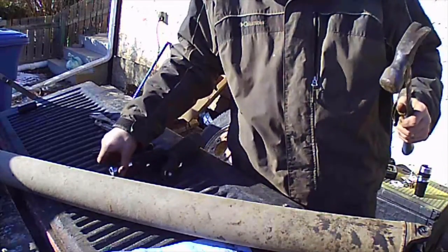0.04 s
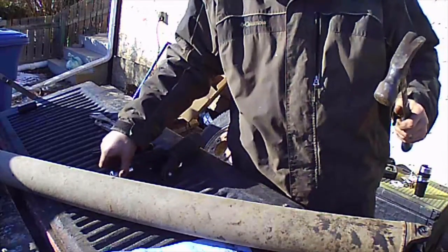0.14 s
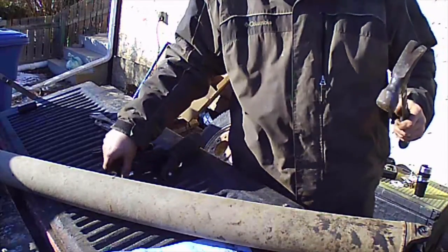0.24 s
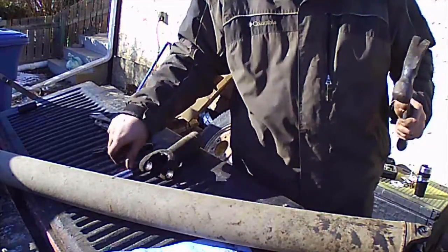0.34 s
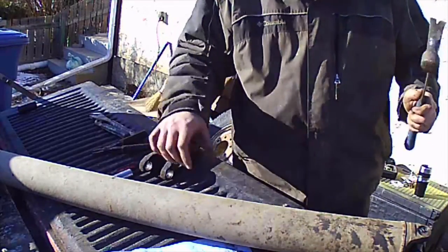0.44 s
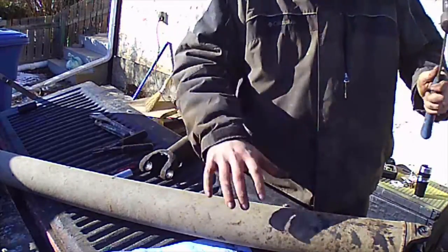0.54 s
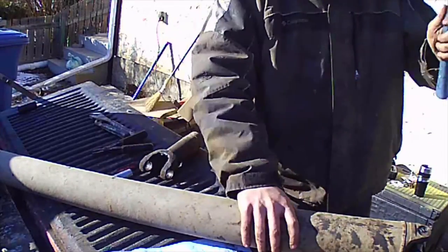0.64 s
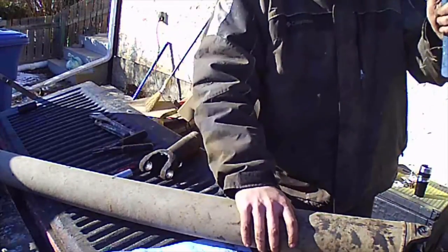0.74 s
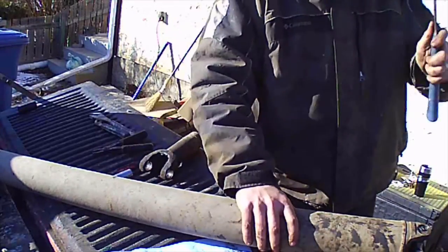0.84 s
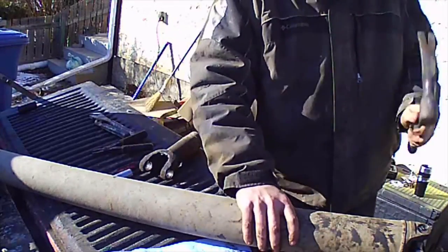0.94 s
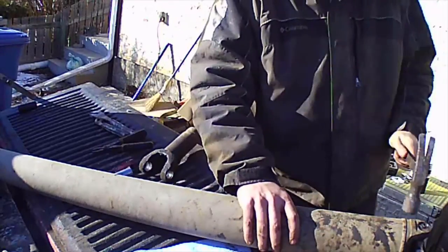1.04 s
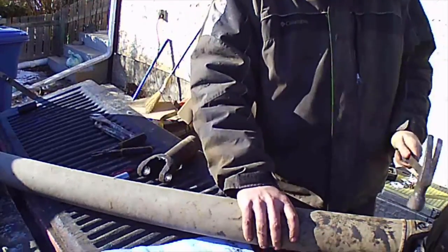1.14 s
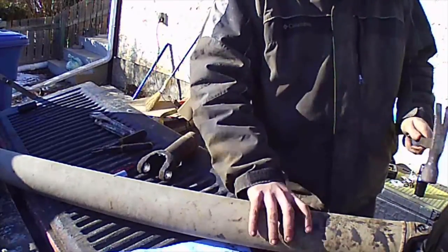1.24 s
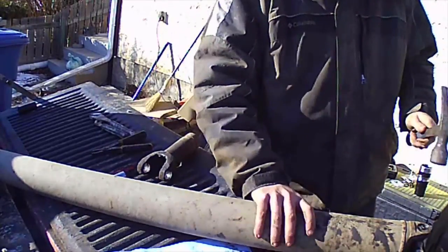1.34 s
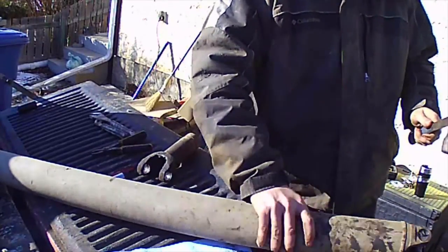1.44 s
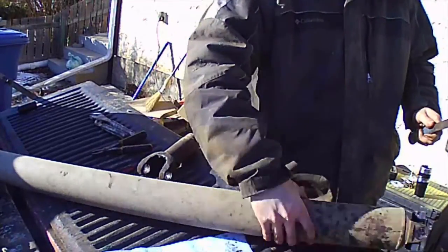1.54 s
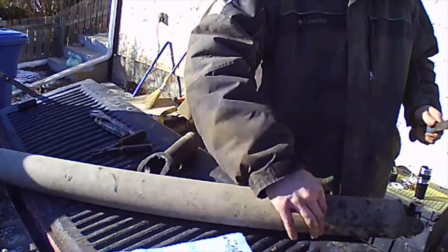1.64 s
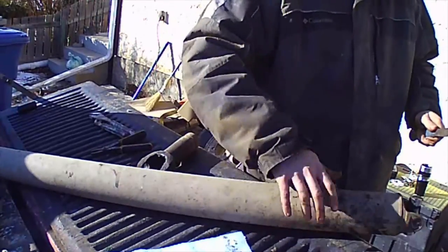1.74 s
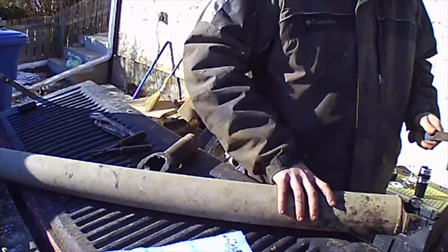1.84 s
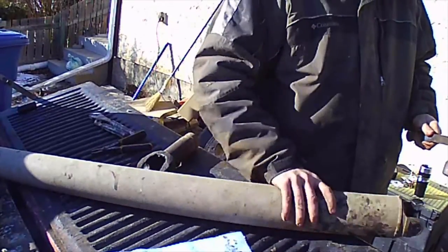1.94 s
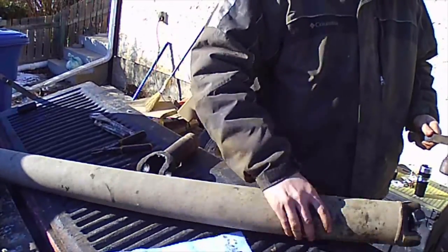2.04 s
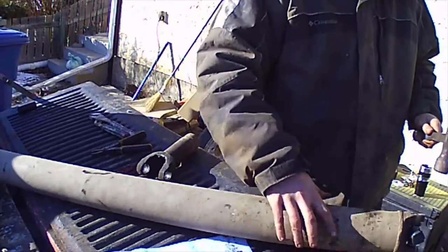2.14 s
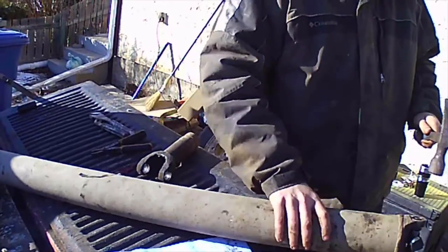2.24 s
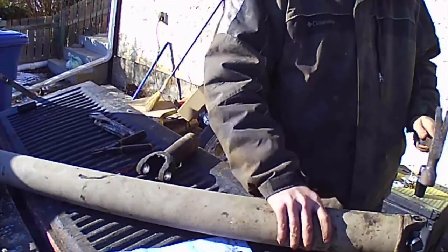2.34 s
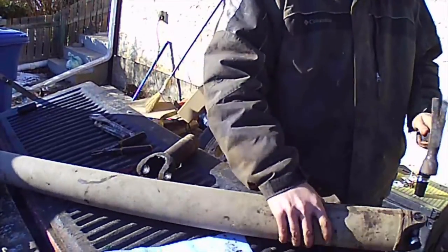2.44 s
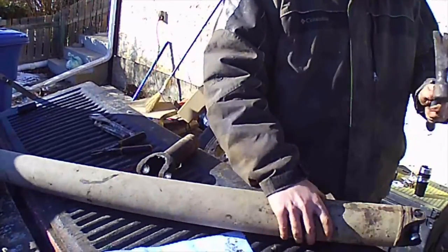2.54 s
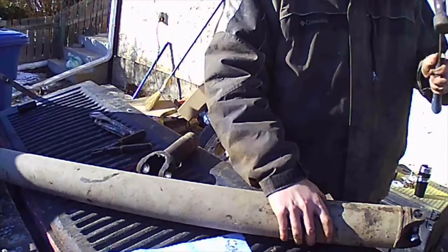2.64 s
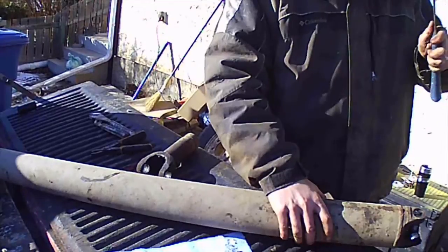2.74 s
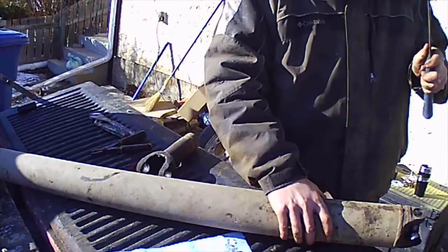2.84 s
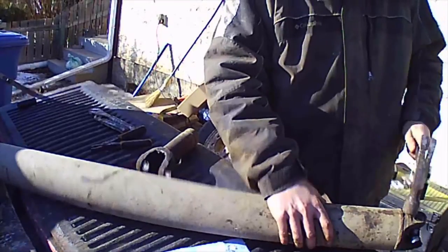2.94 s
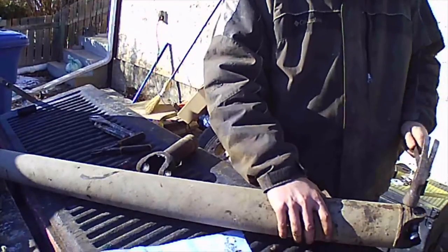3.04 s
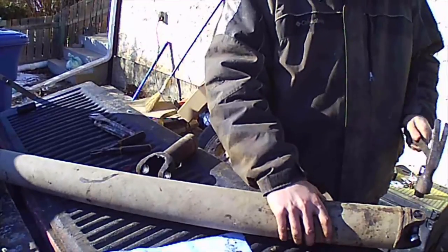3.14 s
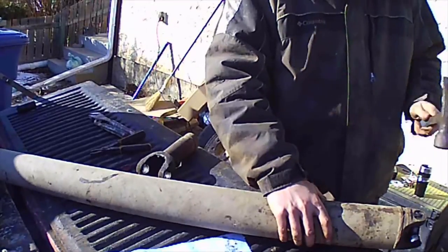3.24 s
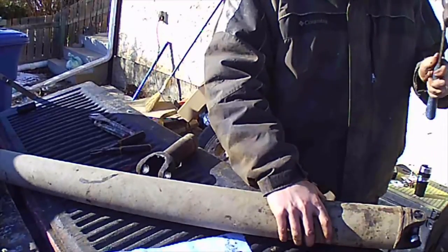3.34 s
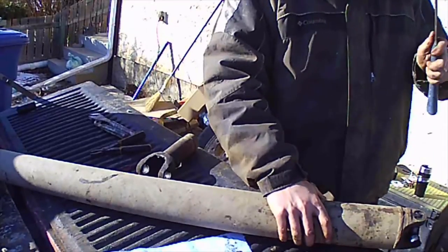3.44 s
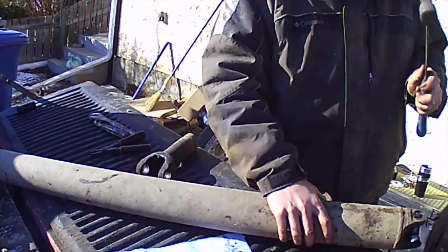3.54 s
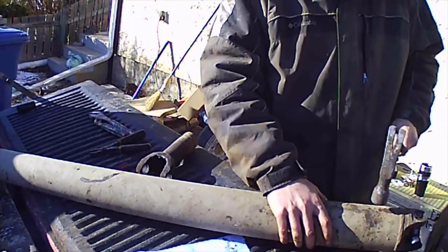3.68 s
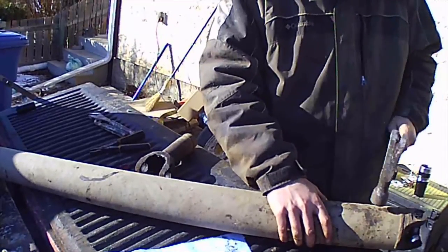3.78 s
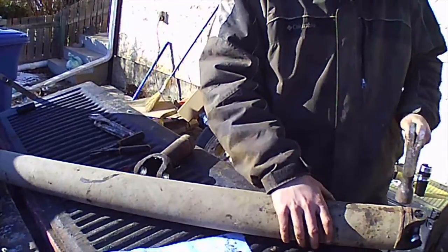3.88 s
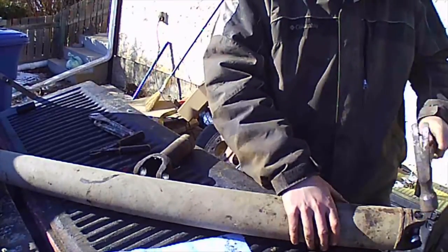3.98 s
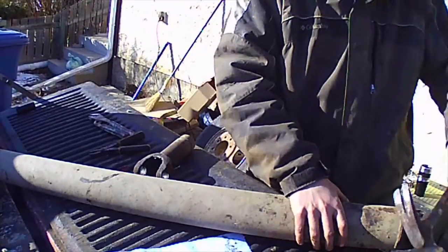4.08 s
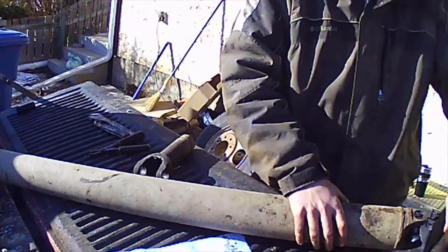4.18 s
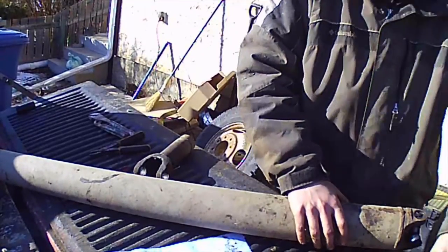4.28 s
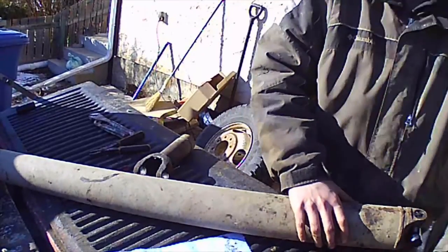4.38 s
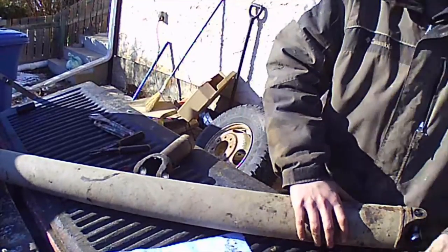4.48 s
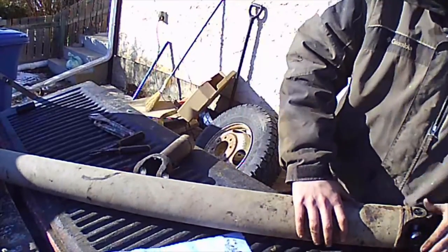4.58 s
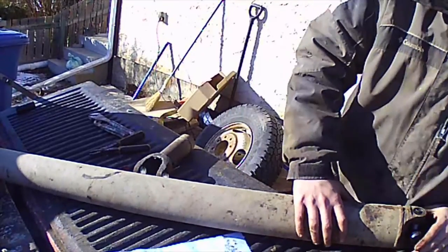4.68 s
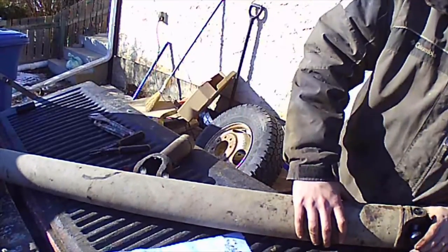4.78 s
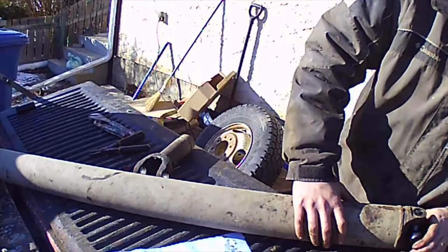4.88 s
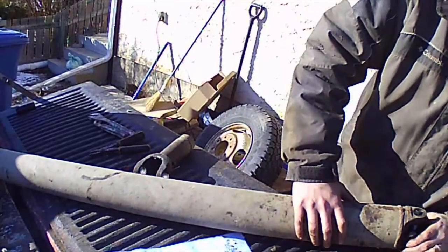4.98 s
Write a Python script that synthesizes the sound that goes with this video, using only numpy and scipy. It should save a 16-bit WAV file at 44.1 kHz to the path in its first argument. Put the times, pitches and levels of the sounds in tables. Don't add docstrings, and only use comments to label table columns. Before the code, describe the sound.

A close, mono microphone outdoors, dry, with faint steady hiss. Small tools tap the ribbed tailgate liner at about 0.1 and 0.25 s, with a faint tick at 0.7. At 1.0 s a hammer hits the driveshaft joint: a harsh, clipped metallic crack, short steel ring and clatter, several rapid rebounds until 1.2, and a deep wobbling boom near 45 Hz from the sprung gate. Tiny ticks come around 1.5, then from 1.57 to 1.75 the heavy tube rolls over the ribs with hollow knocks, loud scraping, grinding and bright chinks. Softer dull bumps and drags follow at 2.1 and 2.45. The second blow lands at 2.97, its tube ring more damped; the third at 3.63 rings most, with bounces at 3.75 and 3.87. From 4.3 to 4.6 a tight run of hard knocks and rattles marks the hammer laid down, thinning to soft bumps and hiss by 4.8.

```python
import sys
import numpy as np
from scipy import signal
from scipy.fft import rfft, irfft
from scipy.io import wavfile
from scipy.ndimage import uniform_filter1d

SR = 44100
rng = np.random.default_rng(int(sys.argv[2]) if len(sys.argv) > 2 else 0)


def decibels_to_gain(level_db):
    exponent = np.asarray(level_db, float) / 20
    return 10 ** exponent


def unload_audio(sound):
    columns = np.transpose(np.atleast_2d(sound))
    steps = np.round(np.clip(columns, -1, 1) * 32767)
    wavfile.write(sys.argv[1], SR, steps.astype(np.int16))


N = 221029
TIME = np.arange(N) / SR
LONG, SHORT = int(.8 * SR), int(.2 * SR)
BANDS_HZ = 140 * 2 ** np.arange(0, 6.8, 1 / 3)

# [t/s, clatter/dB, tube ring/dB, clatter stretch/1, ring stretch/1, truck bed/dB]
BLOWS = [
    (1.0106, -2.5, 2.5, 0.68, 0.75, -20),
    (2.9738, -2.5, -8.5, 0.78, 0.92, -22.5),
    (3.6331, -2, 5, 0.75, 0.55, -18),
]
# [f/Hz, level/dB per Hz]
CLATTER = [(82, -34), (140, -10.5), (520, -5), (781, -9.5), (1500, -3), (2560, -2.5), (3720, -7), (4630, 1),
           (5750, -9.5), (7010, -7), (7580, -11), (14300, -8), (15800, -26)]
# [f/Hz, t60/s]
CLATTER_T60 = [(150, 0.8), (500, 0.52), (1500, 0.4), (4000, 0.21), (9000, 0.19), (15000, 0.13)]
TUBE_HZ = [309, 369, 771, 1302, 1631, 1701, 1766, 2040, 2190, 2285, 2369, 2487, 2633, 2818]
# [blow 1/dB, blow 2/dB, blow 3/dB, bumps/dB, t60/s]
TUBE = [(-37.5, -26, -29, -9, 1.3), (-38.5, -32, -33.5, -18.5, 1.7), (-32.5, -24, -38.5, -5.5, 0.91),
        (-33, -55, -56, -29.5, 1.8), (-12, -17.5, -19.5, -18.5, 0.23), (-4, -1.5, -12, -14, 0.16),
        (-6, -14, -11, -13, 0.36), (-24, -22, -9, -17.5, 0.3), (-36.5, -40.5, -36.5, -15, 0.25),
        (-9, -23, -16.5, -11, 0.51), (-19, -29, -29, -7.5, 0.75), (-18, -9.5, -5.5, -7, 0.4),
        (-11, -9, -12, -9.5, 0.18), (-20.5, -15, -22.5, -18, 0.067)]
YOKE_HZ = [2955, 3038, 3287, 3467, 3953, 4200, 4540, 5100, 5640, 6840, 7208, 7545, 8420, 11750]
# [blow 1/dB, blow 2/dB, blow 3/dB, bumps/dB, t60/s]
YOKE = [(-13, -12, -12, -22.5, 0.096), (-20.5, -14.5, -8.5, -17.5, 0.083), (-7, 1, -7, -20.5, 0.17),
        (-23, -27, -23, -20, 0.34), (-11.5, -15, -12.5, -8, 0.25), (-17.5, -19, -12.5, -23, 0.39),
        (-7.5, -19, -15, -11, 0.2), (-15, -24, -23.5, -18.5, 0.15), (-24, -31.5, -26, -25.5, 0.13),
        (-21.5, -22, -18, -16, 0.43), (-16, -18.5, -12.5, -32, 0.064), (-22.5, -16.5, -21, -34.5, .13),
        (-17.5, -20.5, -15, -27.5, 0.24), (-23, -17, -26, -36, 0.25)]
BODY_HZ = [
    [1100, 1766, 2283, 2622, 2816, 2955, 3284, 3467, 3958, 4205, 4533, 4786, 5087, 6780],
    [1077, 1690, 2396, 2629, 2817, 2955, 3321, 527, 4301, 4545, 4904, 5112, 6239, 6842],
    [1765, 2041, 2485, 2636, 3036, 3289, 3479, 4198, 4553, 4808, 5270, 530, 6790, 7214],
]
# [width/Hz, level/dB]
BODY = [
    [(130, -5.5), (59, 0), (20, -.5), (27, -6), (21, -10), (17, -4), (27, -6), (40, -7), (22, -7.5),
     (35, -7), (30, .5), (25, -7), (40, -11.5), (37, -13)],
    [(59, -5.5), (60, -1), (50, -4), (20, 2), (25, -4), (25, -3), (33, -5), (30, 0), (29, -6), (40, -6),
     (21, -7), (30, -14), (27, -9), (52, -7.5)],
    [(74, -6), (17, 3), (25, 1.5), (26, -4), (38, -6), (22.01, -4), (30, -7.5), (25, -.5), (40, -7),
     (40, -9), (30, -11), (28, -2), (45, -6.5), (20, -8)],
]


def hammer():
    power, rings = np.zeros((len(BANDS_HZ), N)), np.zeros(N)
    *weights_db, _, t60_s = np.transpose(TUBE + YOKE)
    for (s, clatter_db, ring_db, stretch, free, bed_db), mode_db in zip(BLOWS, weights_db):
        bed_tail = fade(np.full(len(BANDS_HZ), .55), size=LONG)
        bed = decibels_to_gain(bed_db) * bed_tail * (BANDS_HZ[:, None] / 1000) ** -.6
        tail = fade(stretch * on_log(CLATTER_T60, BANDS_HZ), size=LONG) + bed
        add(power, s, (decibels_to_gain(clatter_db) * colour(CLATTER) * tail) ** 2)
        add(rings, s, ring(TUBE_HZ + YOKE_HZ, mode_db + ring_db, free * t60_s, size=LONG, rough_db=3))
    dry_clatter = np.sum(np.sqrt(power) * grit(spread_db=2, patchy_db=2.5), axis=0)
    clatter = sheet(dry_clatter, db=2, count=40)
    body = np.zeros(N)
    for blow, hz, peaks in zip(BLOWS, BODY_HZ, BODY):
        body += excite(clatter, blow[0], np.column_stack([hz, peaks]), db=8, fade_s=.046)
    return rings + decibels_to_gain(-2.5) * (clatter + body)


# [f/Hz, level/dB per Hz]
LINER = [(59, -34), (100, -7.5), (500, -4), (631, -4.5), (923, -8), (1070, -5), (2060, -12), (2440, -16),
         (11500, -35.5), (15800, -47)]
# [f/Hz, share of bump t60/1]
LINER_T60 = [(150, 0.97), (600, 1.26), (2000, 0.7), (6000, 1.6), (15000, 0.29)]
# [t/s, peak/dB, treble/dB, t60/s]
TOOLS = [
    (0.081, -37.5, -39, 0.23),
    (0.228, -25, -14.5, 0.36),
    (0.285, -28, -16.5, 0.17),
    (0.71, -45, 1, 0.15),
]
# [t/s, peak/dB, treble/dB, t60/s]
REBOUNDS = [(1.084, -10.5, -3.5, 0.16), (1.121, -9, -9.5, 0.19), (1.157, -16.5, -8, 0.33),
            (1.199, -14, -12.5, 0.15), (3.048, -12, -2, 0.22), (3.079, -10, -8.5, 0.17),
            (3.16, -24, -8, 0.15), (3.186, -27.5, -26.5, 0.15), (3.709, -28, -19, 0.082),
            (3.745, -11.5, -10, 0.39), (3.873, -20, -10.5, 0.23)]
# [t/s, peak/dB, treble/dB, t60/s]
ROLL = [(1.476, -36.5, -4, 0.1), (1.494, -37, -1, 0.11), (1.519, -37, -7, 0.14), (1.569, -11.5, -32, 0.14),
        (1.572, -12.5, -29, 0.096), (1.588, -21, -4, 0.08), (1.619, -17, -20.5, 0.2),
        (1.652, -19, -17, 0.14), (1.668, -14.5, -12.5, 0.27), (1.706, -20, -13, 0.17),
        (1.731, -23.5, -6.5, 0.19), (1.855, -49, -1.5, 0.169), (1.998, -49.5, -5.5, 0.12),
        (2.079, -28, -36, 0.34), (2.133, -34.5, -33, 0.16), (2.27, -45.5, 0.5, 0.054),
        (2.321, -55.5, -7.5, 0.12), (2.436, -27.5, -33, 0.15), (2.49, -38.5, -21, 0.069),
        (2.525, -41.5, -2, 0.16)]
# [t/s, peak/dB, treble/dB, t60/s]
KNOCKS = [(4.306, -22, -6, 0.143), (4.3438, -17, -14, 0.24), (4.3505, -25, 1.5, 0.11),
          (4.4125, -22, -11.5, 0.14), (4.4378, -17, -7.5, 0.18), (4.451, -22.5, -3.5, 0.12),
          (4.464, -16.5, -6, 0.21), (4.498, -23.5, -12, 0.178), (4.568, -21, -11, 0.14),
          (4.635, -30, -12, 0.16), (4.694, -32.5, -13, 0.2), (4.725, -35.5, -40, 0.22),
          (4.799, -50, -13.5, 0.16)]
BUMP_RING_DB = [None, -24, -23, None]
TREBLE_SHARE = [.9, .6, .8, .55]
# [t/s, level/dB, rise/s, fall/s, treble/dB]
DRAGS = [(.714, -56, 0.013, 0.013, 9), (1.3, -45.5, .06, 0.28, -5), (1.455, -45, .012, 0.1, 3),
         (1.557, -33.5, 0.17, 0.077, 1), (1.575, -16.5, 0.013, .13, -2.5), (1.623, -17, 0.013, 0.167, -0.5),
         (1.82, -50, .08, 0.12, 4), (2.005, -43.5, 0.018, 0.236, 4), (2.075, -38.5, 0.13, 0.28, -0.5),
         (2.22, -42.5, 0.016, 0.08, 0.5), (2.41, -55, 0.12, 0.055, 6), (2.44, -33, 0.078, 0.14, 2),
         (3.28, -46, 0.089, 0.32, -4.5), (4.02, -49, .08, 0.29, 1), (4.306, -40, 0.0028, 0.11, 1),
         (4.352, -36, .004, .09, 5), (4.441, -21, 0.002, 0.03, 2.5), (4.53, -35, 0.15, 0.22, -9),
         (4.72, -57.5, .06, .12, -11)]
ROLLING_HZ = [614, 1077, 1717, 2293, 2476, 2632, 2830, 3040, 3295, 3461, 4221, 4550, 4791, 5050]
# [width/Hz, level/dB]
ROLLING = [(30, -4.5), (29.8, -1.5), (30, -4), (14, 4), (25, -3), (19, -1), (26, -1), (30, -5), (17, -7),
           (26, -1), (40, 3), (38, -5), (30, 0), (40, -3)]


def handling():
    power, rings, rub = np.zeros((len(BANDS_HZ), N)), np.zeros(N), np.zeros(N)
    *_, mode_db, tube_t60_s = np.transpose(TUBE + YOKE)
    for bumps, ring_db, share in zip([TOOLS, REBOUNDS, ROLL, KNOCKS], BUMP_RING_DB, TREBLE_SHARE):
        band_share = on_log(LINER_T60, BANDS_HZ) * np.where(BANDS_HZ > 2800, share, 1)
        for s, db, treble_db, t60_s in bumps:
            tail = fade(t60_s * band_share, size=SHORT) + fade(np.array([.01]), size=SHORT)
            tail = swell(BANDS_HZ, size=SHORT) * tail
            add(power, s, (decibels_to_gain(db - 10.5) * colour(LINER, treble_db + 8.0) * tail) ** 2)
            if ring_db is None:
                continue
            spot_db = 1.7 * rng.standard_normal(len(tube_t60_s))
            bump_db = mode_db + spot_db + db + ring_db
            add(rings, s, ring(TUBE_HZ + YOKE_HZ, bump_db, .5 * tube_t60_s, size=SHORT, rough_db=4))

    steel_db, knee_db, slope = -18, -25, .86
    for s, db, rise_s, fall_s, treble_db in DRAGS:
        rise_s, fall_s = max(rise_s, .002), max(fall_s, .01)
        i = slice(int((s - 1.7 * rise_s) * SR), int((s + 2 * fall_s) * SR))
        gain = decibels_to_gain(db - 8.5 - 20 * np.maximum((s - TIME[i]) / rise_s, (TIME[i] - s) / fall_s))
        power[:, i] += (gain * colour(LINER, treble_db + 0.5)) ** 2
        rub_db = steel_db + min(treble_db, 0) - slope * max(db - knee_db, 0)
        rub[i] += (gain * decibels_to_gain(rub_db)) ** 2

    rattle = np.sum(np.sqrt(power) * grit(spread_db=3, patchy_db=2.5), axis=0)
    rolling = excite(rattle, 1.56, np.column_stack([ROLLING_HZ, ROLLING]), db=5, fade_s=.8)
    return rings + np.sqrt(rub) * grinding() + rattle + rolling


GRIND_HZ = [2400, 3050, 3500, 4300, 4900, 5600, 6900, 8600, 9900, 11600, 13900, 14600]


def grinding():
    modes = np.array([band(rng.standard_normal(N), hz, 0.037 * hz) for hz in GRIND_HZ])
    modes = modes / np.std(modes, axis=1, keepdims=True)
    flare_db = 5 * flutter(30, modes.shape)
    return unit(np.sum(modes * decibels_to_gain(flare_db), axis=0))


# [t/s, peak/dB, t60/s, modes above 800 Hz/dB]
LANDINGS = [(.285, -40, .1, -7), (1.569, -18.5, .12, -3), (1.62, -23, 0.1, -5), (1.652, -27.5, 0.11, 2.5),
            (1.707, -31, 0.13, -1.5), (2.08, -33, .12, -6.5), (2.12, -37, 0.17, -15),
            (2.44, -36, 0.13, -7.5), (2.5, -37, 0.1, -15.5), (2.976, -14.5, 0.18, -20.5),
            (3.636, -15.5, .2, -21.5), (4.635, -43, .1, -2), (4.694, -47, 0.095, -11),
            (4.725, -46.5, 0.13, -10)]
# [f/Hz, level/dB]
HOLLOW = [(230, -3.5), (385, 2), (640, -4.5), (1050, -2), (1430, -3.5), (1770, -8.5), (2480, -9)]
# [t/s, peak/dB, t60/s]
CHINKS = [
    (1.731, -34.5, 0.1),
    (1.745, -50, .2),
    (1.769, -41.5, 0.12),
    (1.788, -57, 0.16),
    (1.862, -50.5, 0.11),
    (1.901, -58.5, .1),
]
# [f/Hz, level/dB]
CROSS = [(2030, -6), (2480, -3), (2630, -7.5), (2830, -3.5), (3030, -7), (3290, -15), (3570, -13),
         (4230, 1), (4550, -5), (4790, -9), (5100, -11)]


def landings():
    out = np.zeros(N)
    hz, weight_db = np.transpose(HOLLOW)
    for s, db, t60_s, top_db in LANDINGS:
        mode_db = db + weight_db + top_db * (hz > 800)
        add(out, s, ring(hz, mode_db, np.full(len(hz), t60_s), size=SHORT, rough_db=3))
    hz, weight_db = np.transpose(CROSS)
    for s, db, t60_s in CHINKS:
        add(out, s, ring(hz, db + weight_db, np.full(len(hz), t60_s), size=SHORT, rough_db=2.5))
    return out


# [t/s, peak/dB, f/Hz]
CRACKS = [(0.084, -42, 1300), (0.228, -26, 1310), (0.284, -35, 1300), (1.569, -13, 1300),
          (2.077, -32, 1296), (2.271, -46, 1300), (2.318, -53, 1300), (2.436, -34, 1300),
          (3.874, -23.5, 1310), (4.306, -23, 1310), (4.343, -17, 1300), (4.412, -22, 1300),
          (4.437, -16, 1300), (4.45, -18, 1300), (4.463, -24, 1300), (4.497, -23, 1300), (4.569, -27, 1300),
          (4.573, -25, 1300), (4.635, -35, 1300), (4.693, -43, 1300)]
# [t/s, f/Hz, peak/dB, t60/s]
GLINTS = [(1.575, 7060, -44, .1), (1.59, 5760, -42, .12), (1.638, 11600, -50, .1), (1.64, 14100, -54, .1),
          (1.648, 10000, -54, .1), (1.652, 11250, -52, .08), (1.655, 11700, -47, .08),
          (1.655, 14600, -55, .08), (1.66, 10000, -52, .06), (1.732, 9800, -55, .12),
          (1.732, 7300, -48, .1), (4.3505, 4850, -29.5, .025), (4.3505, 10800, -42, .05),
          (4.464, 4500, -41, .05), (4.975, 1150, -60, .1), (.084, 340, -49, .2), (1.011, 3290, -12, .15),
          (1.011, 3958, -14, .2), (2.974, 3295, -5, .09), (2.974, 527, -17, .2), (3.634, 3290, -11, .15),
          (3.634, 530, -19, .2), (3.634, 3036, -15, .15), (1.5, 2365, -52, .3), (.712, 2440, -56, .07),
          (1.74, 614, -42.5, 0.48), (1.76, 771, -48.5, .9), (4.44, 366, -30.5, .2), (4.57, 339, -36, .3),
          (4.65, 309, -40.5, .3)]


def cracks():
    out, t = np.zeros(N), TIME[:SHORT // 8]
    lag_s, cycles = .001, .63
    for s, db, hz in CRACKS:
        push = 2 * np.sin(2 * np.pi * hz * t) * np.exp(-hz * t / cycles)
        add(out, s + lag_s, decibels_to_gain(db - 0.5) * push)
    for s, hz, db, t60_s in GLINTS:
        add(out, s, ring([hz], np.array([db]), np.array([t60_s]), size=SHORT, rough_db=2))
    return out


PING_HZ = [4225, 2634, 2190, 15200, 14400, 3480, 5050, 3040, 6840]
# [t/s, peak/dB, t60/s]
PINGS = [
    [(.672, -59, 0.05), (1.454, -50.5, 0.094), (1.47, -49, 0.051), (1.486, -49, 0.087), (1.51, -47, 0.073),
     (1.529, -45, 0.23), (1.548, -52, 0.16), (1.901, -56, 0.11), (2.415, -53, 0.12), (4.638, -54, 0.096),
     (4.8, -57.5, 0.1)],
    [(1.74, -38, 0.38), (1.855, -49, 0.1), (4.8, -58, 0.14)],
    [(1.8, -46.5, 0.62)],
    [(3.757, -32.5, 0.088)],
    [(1.2, -51.5, .12)],
    [(1.59, -34, 0.35)],
    [(1.585, -37, 0.1)],
    [(1.52, -45.5, 0.32), (1.73, -48, 0.33)],
    [(3.77, -36, 0.047), (3.872, -39.5, 0.034)],
]


def joint():
    out = np.zeros(N)
    for hz, ticks in zip(PING_HZ, PINGS):
        for s, db, t60_s in ticks:
            add(out, s, ring([hz], np.array([db]), np.array([t60_s]), size=LONG // 2, rough_db=3))
    return out


# [f/Hz, width/Hz, level/dB]
SWAY = [(47, 2.7, -33.5), (32.7, 3, -35)]
# [t/s, level/dB, held/s, t60/s]
HUMS = [(.26, -46.5, 0.09, 0.35), (1.02, -31.5, 0.046, 0.75), (1.45, -39, 0.04, 0.32),
        (1.56, -35.5, 0.083, 0.51), (1.73, -36, 0.034, 0.54), (2.12, -39, 0.042, 0.27),
        (2.26, -48.5, 0.11, 0.41), (2.44, -44, 0.13, 0.75), (2.974, -27.5, 0.06, 0.74),
        (3.634, -31.5, 0.16, 0.87), (4.31, -39.5, 0.062, 0.35), (4.44, -33, 0.076, 0.34),
        (4.49, -33, .13, 0.22), (4.73, -39.5, 0.061, 0.29)]
# [f/Hz, width/Hz, level/dB]
PANELS = [(201.3, 24, -3.5), (217.6, 52, -0.5), (300, 260, -8), (361, 75, -4.5)]
# [t/s, level/dB, t60/s]
DRONES = [(.08, -57, 0.54), (.23, -46, 0.88), (1.011, -16, 0.3), (1.09, -31.5, 1.47), (1.45, -33, 0.37),
          (1.56, -28, 0.75), (1.62, -24.5, 0.49), (1.76, -38.5, 0.93), (2.08, -30, 0.57), (2.3, -52, 0.795),
          (2.44, -29, 0.3), (2.5, -35, 0.28), (2.56, -47, .8), (2.974, -18.5, 0.59), (3.1, -29, 0.81),
          (3.634, -14.5, 0.41), (3.78, -31.5, 0.85), (4.31, -45, 0.57), (4.44, -41, 0.58),
          (4.73, -45, 0.53)]


def tailgate():
    gate = swing()
    sway = sum(decibels_to_gain(db) * noise_band(hz, width) for hz, width, db in SWAY)
    linger = struck([(blow[0], 0, 0, 3.4) for blow in BLOWS], rise_s=.05)
    rest_db, wobble_db = -58, -14.5
    wobble = decibels_to_gain(rest_db) + decibels_to_gain(wobble_db) * uniform_filter1d(np.abs(gate), size=SR // 40)
    cables = noise_band(44, 39)
    hum = np.sqrt(2) * np.sin(2 * np.pi * 142 * TIME) + .5 * noise_band(170, 13)
    hums = decibels_to_gain(-4.0) * struck(HUMS, rise_s=.013)
    drone = unit(sum(decibels_to_gain(db) * noise_band(hz, width) for hz, width, db in PANELS))
    drones = decibels_to_gain(-2.0) * struck([(s, db, 0, t60_s) for s, db, t60_s in DRONES], rise_s=.013)
    return gate + linger * sway + wobble * cables + hums * hum + drones * drone


# [low f/Hz, high f/Hz, low/dB, high/dB, low t60/s]
GATE = [
    (46, 54, -8.5, -10, 1.6),
    (45.5, 58, -9, -10, 0.95),
    (44.5, 56.5, -13, -9, 1.4),
]
# [t/s, peak/dB, f/Hz, t60/s]
JOLTS = [(0.249, -40, 49.3, 1.1), (.67, -40, 43, .6), (.735, -38.5, 47, 1.1), (.89, -43, 43, 0.55),
         (1.292, -24.5, 47, 3.1), (1.569, -15, 46.5, 0.36), (1.62, -10, 44, 0.52), (1.707, -13, 46.2, 0.67),
         (1.799, -18, 48.9, 1.12), (2.121, -21.5, 44.2, 0.54), (2.201, -20, 44.5, 0.73),
         (2.438, -17.5, 43.3, 0.62), (2.493, -17, 42, 0.59), (2.571, -18, 42.3, 1.45), (2.7, -31.5, 43, 3),
         (3.199, -26, 47, 3), (3.99, -22.5, 47, 0.66), (4.301, -29.5, 46.7, 1), (4.42, -30, 47, .5),
         (4.509, -27.5, 47, 0.43), (4.565, -28, 45.5, 0.53), (4.67, -29, 49.9, 0.9)]


def swing():
    rise_s, peak_s, high_t60_s = .014, .031, .73
    frame_hz, frame_db = 33.5, -12.5
    pushes = [(blow[0], *gate) for blow, gate in zip(BLOWS, GATE)]
    pushes += [(s, hz, 55.5, db, db - 10, t60_s) for s, db, hz, t60_s in JOLTS]
    out = np.zeros(N + LONG)
    rise = 1 - np.exp(-(TIME[:LONG] / rise_s) ** 2)
    for s, low_hz, high_hz, low_db, high_db, t60_s in sorted(pushes):
        i = int(s * SR)
        turn = 2 * np.pi * np.outer([low_hz, high_hz, frame_hz], TIME[:LONG] - peak_s)
        decay = fade(np.minimum([t60_s, high_t60_s, t60_s], t60_s), size=LONG)
        level = decibels_to_gain(np.array([[low_db], [high_db], [low_db + frame_db]]))
        springs = np.sum(level * decay * np.sin(turn), axis=0)
        out[i:i + LONG] += rise * (springs - out[i:i + LONG])
    return out[:N]


# [f/Hz, level/dB per Hz]
HISS = [(41, -25), (70, -6.5), (166, -24.5), (227, -18), (470, -26.5), (616, -21), (791, -24), (948, -26.5),
        (12300, -32), (15800, -36)]


def hiss():
    hz = np.maximum(np.fft.rfftfreq(N, 1 / SR), 1)
    x = irfft(rfft(rng.standard_normal(N)) * decibels_to_gain(on_log(HISS, hz)), N)
    return decibels_to_gain(-60) * unit(x)


def ring(hz, db, t60_s, size, rough_db):
    chance = rng.standard_normal((3, len(hz), 1))
    turn = 2 * np.pi * TIME[:size]
    hz = np.reshape(hz, (-1, 1))
    pair = np.sin(turn * hz + chance[0])
    pair = pair + .25 * np.sin(turn * (hz + 16 + 5 * chance[1]) + 3 * chance[2])
    chatter_db = rough_db * flutter(70, pair.shape) * np.exp(-TIME[:size] / .12)
    return np.sum(decibels_to_gain(db[:, None] + chatter_db) * swell(hz, size) * fade(t60_s, size) * pair, axis=0)


def grit(spread_db, patchy_db):
    sizes = np.minimum(rng.exponential(size=N // 32 + 1), 4)
    bands = []
    for hz in BANDS_HZ:
        impacts = np.repeat(decibels_to_gain(spread_db * (hz / 4000) ** 0.12 * sizes), repeats=32)[:N]
        bands.append(band(impacts * rng.standard_normal(N), hz, hz * .23))
    bands = np.array(bands)
    bands = bands * decibels_to_gain(patchy_db * flutter(45, bands.shape))
    return bands / np.std(bands, axis=1, keepdims=True)


def sheet(x, db, count):
    low_hz, high_hz, t60_s = 450, 8000, .13
    x = x + 1e-9 * rng.standard_normal(N)
    out, gap_hz = x.copy(), (high_hz - low_hz) / count
    for hz in np.linspace(low_hz, high_hz, num=count) + gap_hz * rng.uniform(-.4, .4, size=count):
        out += decibels_to_gain(db) * signal.lfilter(*signal.iirpeak(hz, hz * t60_s / 2.2, fs=SR), x)
    return out * np.std(x) / np.std(out)


def excite(x, s, peaks, db, fade_s):
    i = int(s * SR)
    part = x[i:i + LONG // 2] * np.exp(-TIME[:LONG // 2] / fade_s)
    out = np.zeros(len(part))
    for hz, width_hz, peak_db in peaks:
        peak = signal.iirpeak(hz, hz / max(width_hz, 8), fs=SR)
        out = out + decibels_to_gain(db + peak_db) * signal.lfilter(*peak, part)
    return np.pad(out, (i, N))[:N]


def struck(rows, rise_s):
    power, t = np.zeros(N), TIME[:2 * LONG]
    rise = swell(1 / rise_s, size=len(t))[0]
    for s, db, held_s, t60_s in rows:
        fall_db = 60 * np.maximum(t - held_s, 0) / max(t60_s, .05)
        add(power, s, (decibels_to_gain(db - fall_db) * rise) ** 2)
    return np.sqrt(power)


def colour(spectrum, treble_db=0.):
    lift = np.clip(np.log2(BANDS_HZ / 1500) / 1.5, 0, 1.6)
    gain = decibels_to_gain(on_log(spectrum, BANDS_HZ)) * np.sqrt(BANDS_HZ)
    middle = (BANDS_HZ > 400) & (BANDS_HZ < 2500)
    gain = gain / np.sqrt(np.sum(gain[middle] ** 2))
    return gain[:, None] * decibels_to_gain(np.outer(lift, treble_db))


def fade(t60_s, size):
    return np.exp(-np.log(1000) * TIME[:size] / np.clip(t60_s, .01, 3)[:, None])


def swell(hz, size):
    return 1 - np.exp(-TIME[:size] * np.reshape(hz, (-1, 1)))


def flutter(rate_hz, shape):
    rows, size = shape
    k = int(SR / rate_hz)
    steps = np.repeat(rng.standard_normal((rows, size // k + 1)), k, axis=1)
    return uniform_filter1d(steps, k, axis=1)[:, :size]


def on_log(table, hz):
    f, v = np.transpose(table)
    return np.interp(np.log(hz), np.log(f), v)


def unit(x):
    return x / np.sqrt(np.mean(x ** 2))


def band(x, hz, width_hz):
    edges_hz = [hz - width_hz / 2, hz + width_hz / 2]
    return signal.sosfilt(signal.butter(2, edges_hz, "bandpass", fs=SR, output="sos"), x)


def noise_band(hz, width_hz):
    return unit(band(rng.standard_normal(N), hz, width_hz))


def add(out, s, sound):
    i = int(s * SR)
    out[..., i:i + sound.shape[-1]] += sound[..., :N - i]


def scene():
    return (hammer() + handling() + landings() + cracks() + joint() + tailgate() + hiss())[None]


def band_limit(x):
    return signal.sosfilt(signal.butter(12, 15900, fs=SR, output="sos"), x)


def record(dry):
    offset, ceiling = .0727, .97
    mix = np.clip(dry + offset, -ceiling, ceiling)
    return band_limit(mix)


dry = scene()
out = record(dry)
unload_audio(out)
```